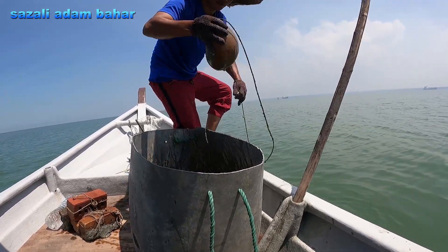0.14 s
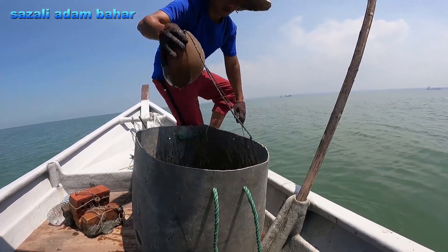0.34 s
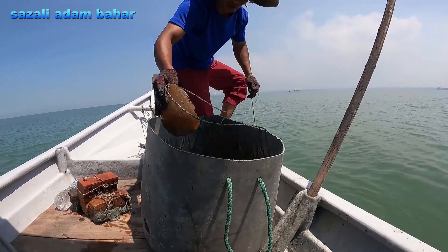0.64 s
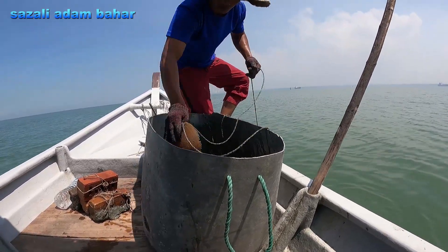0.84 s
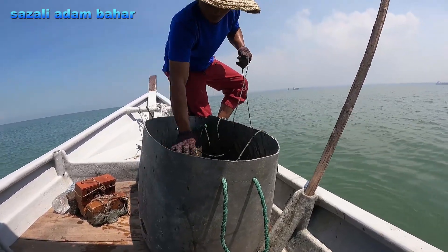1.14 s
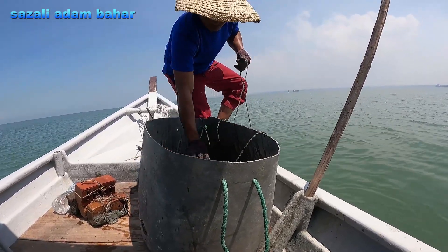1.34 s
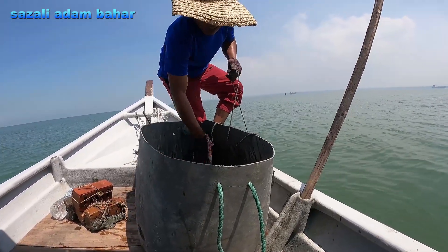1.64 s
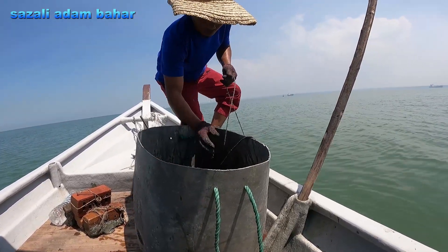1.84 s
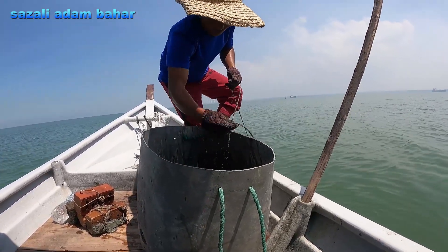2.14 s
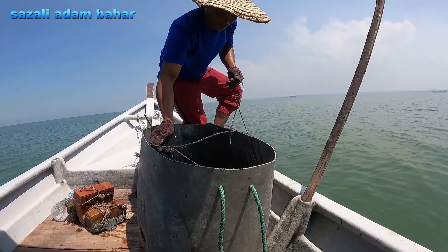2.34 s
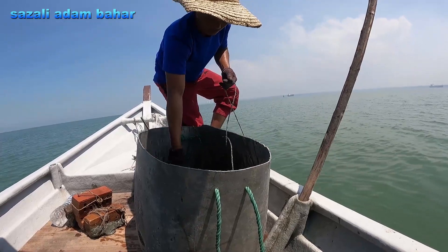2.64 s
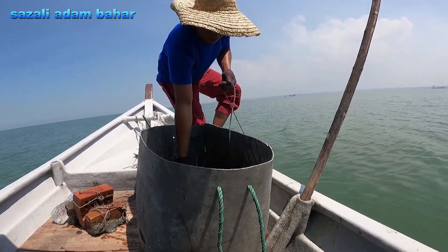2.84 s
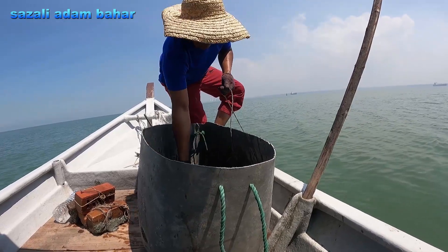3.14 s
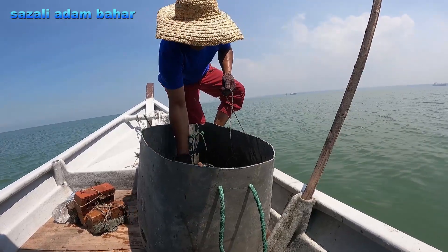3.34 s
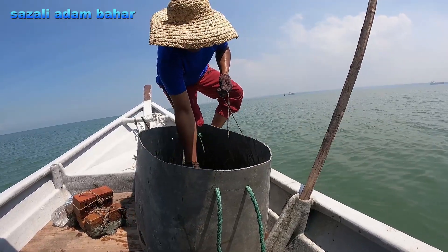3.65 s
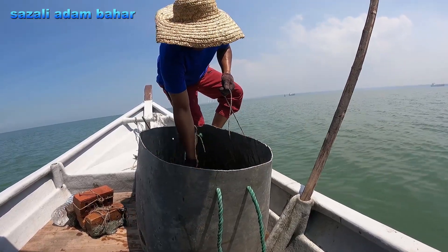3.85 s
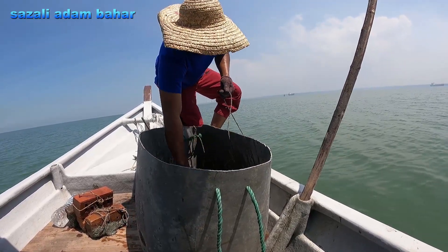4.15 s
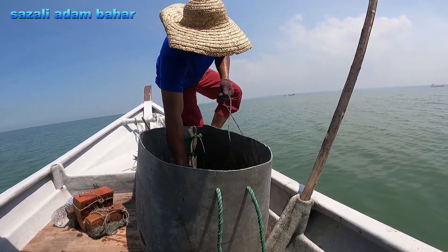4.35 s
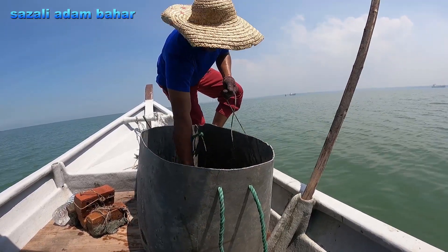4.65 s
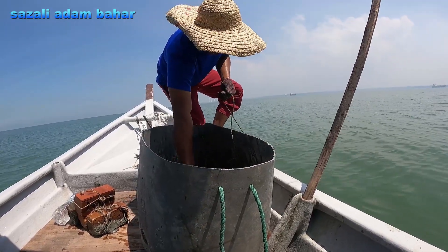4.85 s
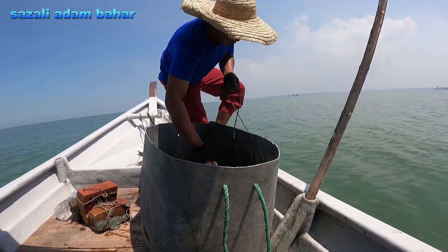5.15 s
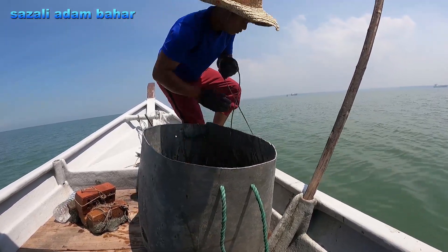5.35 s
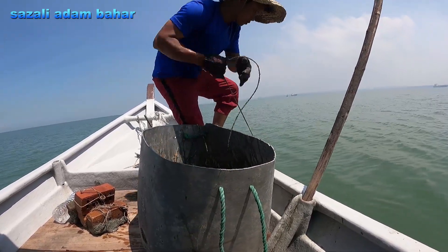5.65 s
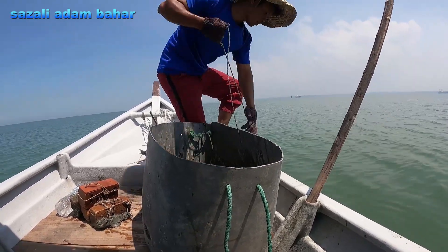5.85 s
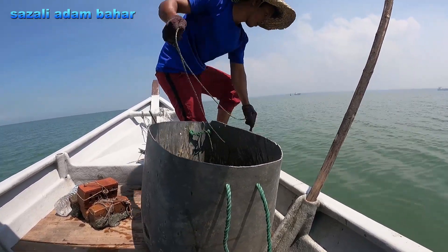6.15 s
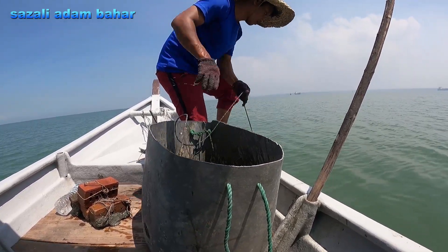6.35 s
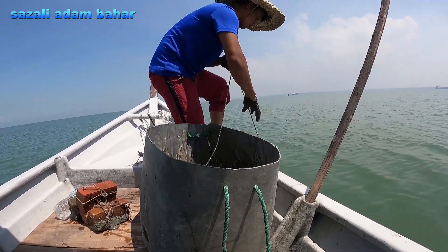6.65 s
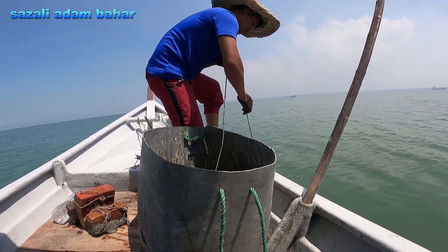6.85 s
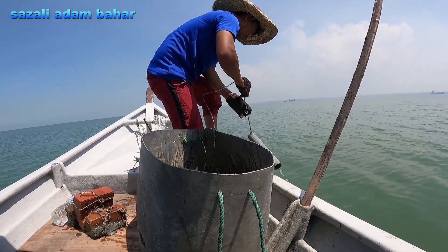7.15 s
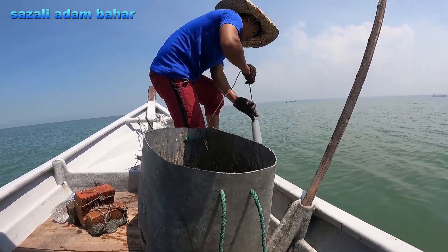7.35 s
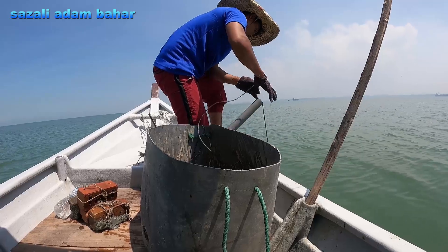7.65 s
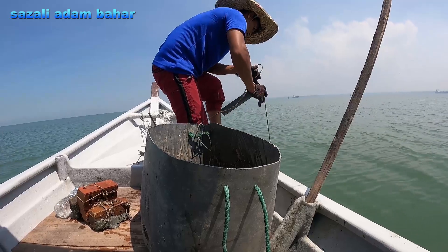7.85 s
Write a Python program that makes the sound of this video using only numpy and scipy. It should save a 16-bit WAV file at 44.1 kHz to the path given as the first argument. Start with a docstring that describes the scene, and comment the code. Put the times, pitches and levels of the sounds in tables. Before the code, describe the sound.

A small wooden boat idles on calm water, its engine throbbing low under a soft wash against the hull. Close by, shell traps clack and scrape inside a drum while feet and traps thud irregularly on the planks. Wet line drags over the rim with small squeaks, throwing off spray and ticking drops. The knocks come in uneven clusters, with the heaviest thuds near the end.

```python
"""Shell traps on an idling boat

A small wooden boat idles on calm water while shell traps and wet line are dropped into a drum close by.
The engine throbs through exhaust and hull, feet and traps thud on the planks, and shells clack and scrape
against the drum wall. The dragged line squeaks and throws off spray, drops tick on drum and deck,
and water laps and gurgles along the side."""
import sys
import numpy as np
from scipy import signal
from scipy.fft import rfft, irfft, next_fast_len
from scipy.io import wavfile
from scipy.ndimage import uniform_filter1d

SR = 44100
rng = np.random.default_rng(int(sys.argv[2]) if len(sys.argv) > 2 else 0)


def pcm_store(signal):
    """Save signal as 16-bit PCM."""
    levels = np.round(np.clip(np.atleast_2d(signal), -1, 1) * 32767)
    wavfile.write(sys.argv[1], SR, levels.astype(np.int16).T)


N = 352785

# Dull blows on the planks. Each row: start in seconds, peak in dB, struck pitch in Hz,
# push length in seconds, ring time in seconds.
PLANK_BLOWS = [(0.16, -13.5, 323, 0.06, 0.026), (0.261, -9.5, 423, 0.034, 0.025),
               (0.292, -11, 140, 0.035, 0.014), (0.442, -18, 155, 0.014, 0.13),
               (1.103, -10, 206, 0.0125, 0.13), (1.119, -5.5, 194, 0.004, 0.11),
               (1.149, -13, 173, 0.0057, 0.22), (1.243, -15.5, 219, 0.022, 0.15),
               (1.256, -24, 336, 0.039, 0.039), (1.574, -13.5, 161, 0.032, 0.036),
               (1.646, -15, 272, 0.019, 0.21), (1.729, -16.5, 443, 0.02, 0.19),
               (1.972, -16.5, 473, 0.017, 0.1), (2.034, -27.5, 424, 0.033, 0.026),
               (2.177, -20, 139, 0.17, 0.49), (2.39, -30, 146, 0.023, 0.24),
               (2.705, -15.5, 252, 0.044, 0.048), (3.071, -6, 285, 0.041, 0.11),
               (3.687, -11, 180, 0.0083, 0.069), (3.703, -5.5, 105.6, 0.024, 0.059),
               (3.747, -12.5, 100, 0.011, 0.028), (3.798, -2.5, 120, 0.044, 0.023),
               (3.92, -18.5, 182, 0.026, 0.025), (3.978, -19.5, 170, 0.043, 0.026),
               (4.421, -28, 192, 0.15, 0.027), (4.556, -14, 416, 0.013, 0.16),
               (5.013, -7.5, 160, 0.017, 0.02), (5.028, -4.5, 167, 0.023, 0.19),
               (5.189, -21.5, 422, 0.023, 0.089), (5.594, -10.5, 166, 0.025, 0.31),
               (5.614, -12.5, 134, 0.013, 0.088), (5.857, -18.5, 190, 0.075, 0.88),
               (6.271, -10.5, 161, 0.025, 0.14), (6.361, -15.5, 271, 0.039, 0.19),
               (6.733, -1.5, 244, 0.019, 0.033), (6.749, 0, 220, 0.022, 0.11),
               (6.763, -2.5, 246, 0.018, 0.17), (6.787, -5.5, 132, 0.016, 0.25),
               (6.815, -10, 176, 0.027, 0.037), (6.851, -8.5, 192, 0.011, 0.12),
               (6.9, -16.5, 161, 0.051, 0.16), (6.955, -22, 143, 0.037, 0.19),
               (7.16, -14, 204, 0.036, 0.094), (7.241, -19.5, 249, 0.039, 0.08),
               (7.793, -14, 183, 0.035, 0.19)]
# The wooden hull's modes. Each row: pitch in Hz, relative level in dB.
HULL_MODES = [(105, 1), (142, 17), (168, 15.5), (198, 16), (222, 4.5), (250, 3.5), (290, 4), (328, 1.5),
              (395, -8), (455, -11.5), (525, -45)]
# Shells landing in the drum. Each row: start in seconds, peak of the ring in dB, pitch in Hz,
# edge and treble in dB relative to that peak, crunch length in seconds.
SHELL_HITS = [(0.156, -31.5, 460, -8.5, -25, 0.3), (0.262, -11, 550, -26, -28.5, 0.11),
              (0.444, -31, 1334, -27, -27, 0.21), (0.483, -26, 1136, -9.5, -11, 0.13),
              (0.576, -36, 1010, -29, -33, 0.15), (0.789, -61.5, 452, -10, 24.5, 0.08),
              (0.837, -26, 921, -11.5, -14, 0.18), (0.859, -30.5, 697, -28, -19, 0.073),
              (1.239, -32, 445, -7, -40, 0.32), (1.485, -31.5, 730, -17, -22, 0.08),
              (1.566, -8.5, 1090, -4, 0.5, 0.17), (1.574, -13, 949, -30, -40, 0.11),
              (1.585, -14.5, 500, -2, -36, 0.14), (1.719, -6.5, 982, -25.5, -44, 0.1),
              (1.73, -11, 1022, -27, -41, 0.041), (1.778, -28, 508, -22, -19.5, 0.13),
              (1.967, -35, 437, -7.5, -40, 0.14), (2.005, -40, 2370, 1.5, -36, 0.27),
              (2.042, -25, 492, -31, -36, 0.011), (2.078, -35, 490, -12, -19, 0.15),
              (2.211, -27, 556, -19, -20, 0.14), (2.245, -18.5, 668, -20, -28, 0.38),
              (2.265, -12.5, 950, -15.5, -45, 0.14), (2.309, -21, 1010, -29, -31, 0.11),
              (2.376, -18.5, 923, -19, -29, 0.21), (2.39, -15.5, 985, -13.5, -29, 0.25),
              (2.446, -23, 605, -32, -33, 0.33), (2.487, -22.5, 910, -22, -31, 0.11),
              (2.556, -31.5, 900, -24, -22, 0.14), (2.602, -29, 980, -36, -34, 0.12),
              (2.706, -26.5, 543, 4.5, -36, 0.15), (2.873, -33, 1610, 0, -35, 0.092),
              (3.07, -25, 427, -8, -43, 0.18), (3.25, -46.5, 1750, 4.5, 1, 0.19),
              (3.685, -30.5, 527, -13.5, -22, 0.18), (3.714, -41.5, 467, 10, -6, 0.33),
              (3.742, -10, 1030, -8.5, -14, 0.13), (3.802, -15.5, 444, -22, -35, 0.1),
              (3.936, -29, 1306, -29, -40, 0.067), (3.918, -31.5, 460, -35, -21, 0.29),
              (3.97, -45, 550, 8, 7.5, 0.38), (4.133, -42, 1370, -2.5, -23, 0.19),
              (4.29, -26, 1230, -16.5, -38, 0.13), (4.434, -18.5, 520, -38, -33, 0.033),
              (4.445, -19, 920, -25, -34, 0.096), (4.555, -14.5, 2180, -20, -45, 0.1),
              (5.011, -44, 477, 1, -11, 0.088), (5.059, -35, 1270, -4, -26, 0.17),
              (5.091, -46.5, 1250, 9, -23, 0.14), (5.275, -35.5, 1310, -7, -32, 0.093),
              (5.453, -31, 890, -30, -39, 0.15), (5.477, -29.5, 980, -15, -36, 0.24),
              (5.524, -23, 512, -36, -39, 0.066), (5.563, -27.5, 980, -29, -50, 0.061),
              (5.591, -23.5, 940, -15, -51, 0.14), (5.631, -24, 679, -22, -26, 0.14),
              (5.716, -47, 544, 0, 1.5, 0.34), (5.806, -31, 1050, -19, -40, 0.44),
              (5.852, -36, 1100, -20, -43, 0.067), (5.891, -39, 1320, -23, -37, 0.099),
              (5.957, -37.5, 560, -12, -10, 0.85), (6.3, -30.5, 568, -16, -22, 0.12),
              (6.402, -33, 462, -13, -8, 0.12), (6.415, -31.5, 1350, -13, -30, 0.065),
              (6.449, -33, 1020, -15, -27.5, 0.79), (6.519, -24.5, 1275, -18, -29, 0.1),
              (6.557, -25, 1290, -17, -37, 0.26), (6.57, -17, 792, -16, -41, 0.38),
              (6.627, -24, 1280, -26, -32, 0.08), (6.729, -13.5, 1480, -8, -32, 0.09),
              (6.74, -16.5, 743, -9.5, -36, 0.12), (6.806, -28, 560, -16, -41, 0.14),
              (6.85, -32.5, 680, -5, -30, 0.28), (7.179, -31, 790, -7, -58, 0.19),
              (7.234, -29, 1064, -3.5, -15, 0.072), (7.249, -34, 1130, -3, -20, 0.14),
              (7.392, -26, 810, -7, -53, 0.12), (7.549, -47, 1140, -19, -30, 0.31),
              (7.607, -32.5, 2250, -20, -32, 0.074), (7.752, -46, 1430, -10, -19, 0.089),
              (7.794, -35.5, 765, -31, -42, 0.069), (7.888, -28.5, 1290, -40.5, -59, 0.091),
              (7.896, -24.5, 646, -40, -45, 0.08)]
# Line and shells dragged about. Each row: start and length in seconds, strongest moment as a share
# of the length, levels of plank rumble, scrape and spray in dB, drum pitch in Hz.
DRAG_MOVES = [(0.079, 0.096, 0.41, -41, -65, -53, 2530), (0.143, 0.43, 0.69, -28, -46.5, -48, 1133),
              (0.557, 0.068, 0.83, -31, -42.5, -50, 820), (0.65, 0.19, 0.26, -58, -98, -61, 900),
              (1.031, 0.064, 1, -58, -63, -33, 650), (1.079, 0.15, 0.29, -50, -52.5, -24.5, 1170),
              (1.235, 0.065, 0.19, -48, -70, -34.5, 900), (1.385, 0.29, 0.69, -38.5, -43, -52.5, 837),
              (1.622, 0.19, 0.23, -29, -36.5, -50.5, 554), (1.951, 0.12, 0.21, -30.5, -55, -58, 550),
              (2.153, 0.14, 0.17, -31, -52, -42, 1330), (2.189, 0.16, 0.81, -26, -30, -52, 967),
              (2.386, 0.17, 0.18, -25.5, -37, -59, 917), (2.562, 0.21, 0.81, -27, -38, -48.5, 870),
              (2.753, 0.18, 0.23, -35, -47.5, -54, 736), (2.864, 0.042, 0.44, -28, -36, -67, 1090),
              (2.998, 0.093, 0.4, -44, -54.5, -55, 1080), (3.328, 0.091, 0.15, -39, -50, -51, 1090),
              (3.203, 0.13, 0.33, -49, -54.5, -47, 1140), (3.696, 0.13, 0.58, -14, -30, -29, 947),
              (3.887, 0.089, 0.62, -21.5, -39, -66, 624), (3.963, 0.082, 0.11, -45, -44.5, -32, 1926),
              (4.071, 0.12, 0.08, -39.5, -53.5, -41, 1960), (4.192, 0.06, 0.26, -57, -85, -50, 1200),
              (4.244, 0.18, 0.27, -48, -58, -48, 1180), (4.366, 0.088, 0.71, -50, -48, -39.5, 810),
              (4.455, 0.24, 0.29, -35, -45, -43, 890), (4.66, 0.17, 0.33, -55, -69, -54, 920),
              (4.776, 0.097, 0.44, -43, -57, -46, 915), (4.866, 0.074, 0.3, -48, -60, -65, 920),
              (4.948, 0.095, 0.99, -22, -52.5, -68, 925), (5.012, 0.21, 0.61, -29.5, -43.5, -35, 1200),
              (5.202, 0.27, 0.43, -31.5, -47.5, -50, 1064), (5.421, 0.35, 0.19, -26.5, -39, -51.5, 913),
              (5.728, 0.27, 0.33, -28.5, -38.5, -57, 595), (5.902, 0.3, 0.42, -32, -43, -47, 576),
              (5.868, 0.3, 0.71, -58, -51.5, -65, 1297), (6.202, 0.68, 0.3, -28.5, -42.5, -48.5, 682),
              (6.504, 0.13, 0.77, -25, -44, -41, 1230), (6.56, 0.076, 0.41, -45, -37.5, -60, 1340),
              (6.842, 0.2, 0.04, -25, -38.5, -49, 903), (6.982, 0.2, 0.44, -32.5, -50, -57, 1010),
              (7.129, 0.08, 0.91, -30, -38, -44, 788), (7.23, 0.044, 0.88, -19.5, -30, -42, 1100),
              (7.303, 0.069, 0.41, -23.5, -47.5, -58, 740), (7.389, 0.072, 0.3, -43, -36.5, -64, 750),
              (7.447, 0.062, 0.53, -53, -44.5, -66, 800), (7.542, 0.051, 0.73, -51, -62, -63, 1170),
              (7.608, 0.082, 0.36, -60, -59.5, -67, 1140), (7.855, 0.38, 0.12, -30, -61.5, -76, 810)]

LOW_RISE_S, HIGH_RISE_S = 0.015, 0.006  # attack of dark and of bright layers
FLICKER_DB = 1.7  # quick level wobble of rumble, scrape and spray


def undb(db):
    """Gain of a level in dB."""
    return 10 ** (np.asarray(db) / 20)


def unit(x):
    """Scale to rms 1."""
    return x / np.sqrt(np.mean(x ** 2))


def peak(x, db):
    """Scale so that the loudest few milliseconds reach db."""
    return x * undb(db) / np.sqrt(2 * uniform_filter1d(x ** 2, 200).max())


def add(out, start, x):
    """Mix x in from start, in seconds."""
    i = int(start * SR)
    out[i:i + len(x)] += x[:len(out) - i]


def curve(table):
    """Columns of a time table, one value a sample."""
    rows = np.array(table)
    return [np.interp(np.arange(N) / SR, rows[:, 0], col) for col in rows.T[1:]]


def low(x, hz):
    """Steep low-pass."""
    return signal.sosfilt(signal.butter(4, hz, fs=SR, output="sos"), x)


def resonate(x, hz, width):
    """Two-pole resonance, gain 1 at the centre."""
    return signal.lfilter(*signal.iirpeak(hz, max(hz / width, .3), fs=SR), x)


def smear(x, tail_s):
    """Give every sample an exponential tail."""
    return signal.lfilter([1], [1, -np.exp(-1 / (tail_s * SR))], x)


def colour(x, table):
    """Shape a long sound by (Hz, gain) points."""
    hz, gain = np.transpose(table)
    n = next_fast_len(len(x) + SR // 10)
    f = np.fft.rfftfreq(n, 1 / SR) + 1
    return irfft(rfft(x, n) * np.interp(np.log(f), np.log(hz), gain), n)[:len(x)]


def gains(table):
    """(Hz, dB) points as (Hz, gain)."""
    return [(hz, undb(db)) for hz, db in table]


def walk(rate):
    """Smooth random drift, rate steps a second, spread near 1."""
    hold = int(SR / rate)
    steps = np.repeat(rng.standard_normal(N // hold + 1), hold)[:N]
    return 1.396 * uniform_filter1d(uniform_filter1d(steps, hold), hold)


def aftermath(starts, dbs, t60s, rise_s):
    """Power that builds quickly after each blow and dies away."""
    out, t = np.zeros(N), np.arange(SR // 2) / SR
    attack = np.sin(np.pi / 2 * np.minimum(t / rise_s, 1)) ** 2
    for start, db, t60 in zip(starts, dbs, t60s):
        add(out, start, (attack * undb(db - 60 * t / max(t60, .01))) ** 2)
    return out


def engine(firing_hz=20.28, boom_below_hz=163, boom_s=0.14):
    """One uneven firing a cycle rings the exhaust and hull; low blows make the hull boom along."""
    # The idle's swells. Each row: time in seconds, level in dB.
    idle_levels = [(0, -18.5), (0.5, -34), (0.95, -26), (1.5, -36.5), (2.0, -26), (2.6, -25), (3.0, -29),
                   (3.5, -26), (4.0, -31), (4.4, -22), (4.95, -32.5), (5.4, -29.5), (5.95, -22), (6.7, -24),
                   (7.0, -31.5), (7.5, -28.5), (8.0, -18.5)]
    # Exhaust and hull resonances. Each row: pitch in Hz, width in Hz, relative level in dB.
    exhaust_modes = [(59.93, 9.9, -8), (81.44, 6.8, -12), (38, 13, -33), (145.4, 29.7, -20)]
    cycles = np.cumsum(firing_hz * (1 + 0.00991 * walk(1.8))) / SR
    firings = np.diff(np.floor(cycles), prepend=0)
    pulses = unit(firings * undb(6.4 * walk(25))) + 0.91 * rng.standard_normal(N)
    throb = sum(undb(db) * unit(resonate(resonate(pulses, hz, width), hz, width))
                for hz, width, db in exhaust_modes)
    starts, blow_db, blow_hz, _, _ = np.transpose(PLANK_BLOWS)
    boom_db = blow_db - 4.5 - 10 * np.log10(1 + (blow_hz / boom_below_hz) ** 6)
    boom_power = aftermath(starts, boom_db, np.full_like(starts, boom_s), LOW_RISE_S)
    return unit(throb) * np.sqrt(undb(curve(idle_levels)[0]) ** 2 + boom_power)


def sea(level_db=-30.5):
    """Water laps at the hull as a soft, deep wash."""
    # Tone of the wash. Each row: frequency in Hz, relative level in dB.
    wash_spectrum = [(12, -52), (20, -48), (53, 11), (83, 7), (129, -11.5), (180, -17.5), (705, -63),
                     (1820, -52), (3260, -99), (7510, -55), (12100, -60.5), (15500, -106)]
    return unit(colour(rng.standard_normal(N), gains(wash_spectrum))) * undb(level_db + walk(0.74))


def snags(per_second=16):
    """The line catches and lets go: a level in dB that jumps at random and sinks back."""
    jumps = (rng.random(N) < per_second / SR) * rng.exponential(size=N).clip(max=2.5)
    db = 1.6 * smear(jumps, tail_s=.02)
    return db - db.mean()


def pull(start, length, strongest, jerk_db, sag_db=11.5, fall_s=0.05):
    """Gain of one drag: a quick start, a swell to its strongest moment, a sag and a fade."""
    first = int(start * SR)
    t = np.arange(min(int((length + 4 * fall_s) * SR), N - first)) / SR
    swell_db = np.interp(t / length, [0, np.clip(strongest, .02, .98), 1], [-sag_db, 0, -sag_db])
    rise_s = 0.013 + 0.18 * strongest * length
    fades_db = -20 * np.maximum(1 - t / rise_s, 0) - 20 * np.maximum(t - length, 0) / fall_s
    return undb(swell_db + fades_db + jerk_db[first:first + len(t)])


def drag_power(layer, jerk_db):
    """Power that all the drags give to the "rumble" or the "spray"."""
    out, column = np.zeros(N), {"rumble": 3, "spray": 5}[layer]
    for row in DRAG_MOVES:
        add(out, row[0], (undb(row[column]) * pull(*row[:3], jerk_db)) ** 2)
    return out


def plank_rumble(jerk_db, rest_db=-43.5):
    """Boards rumble in the hull's modes under each drag and after each blow."""
    starts, db, _, _, ring_s = np.transpose(PLANK_BLOWS)
    blow_power = aftermath(starts, db - 22, 3.4 * ring_s, LOW_RISE_S)
    power = undb(rest_db) ** 2 + drag_power("rumble", jerk_db) + blow_power
    push = rng.standard_normal(N) * undb(FLICKER_DB * walk(21))
    boards = sum(undb(mode_db) * resonate(push, hz, 16.6) / hz for hz, mode_db in HULL_MODES)
    return unit(low(boards, 379)) * np.sqrt(power)


def drum(x, hz, octaves):
    """The drum wall colours what strikes it, most near the struck pitch."""
    # The wall's modes. Each row: pitch in Hz, relative level in dB, width in Hz.
    wall_modes = [(403, 12.5, 58), (522.7, 11.5, 39.5), (612, 11, 9.2), (681, 6, 29), (765.3, 5, 38),
                  (912.6, 3, 57), (980, 6, 26), (1063, 2.5, 125), (1228, 5.5, 28), (1299, 3.5, 36),
                  (1495, -1, 260), (1733, 3, 52), (1843, 4, 46), (2050, 0, 440), (2710, -2.5, 430),
                  (2833, 4, 77)]
    return sum((-1) ** k * undb(db) * np.exp(-(np.log2(f / hz) / octaves) ** 2) * resonate(x, f, width)
               for k, (f, db, width) in enumerate(wall_modes))


def slips(rate, spread_db):
    """Stick-slip: separate jerks at random moments, of uneven size."""
    return (rng.random(N) < rate / SR) * rng.standard_normal(N) * undb(spread_db * rng.standard_normal(N))


def trickle():
    """Water runs off the line: small bubbles at random moments, each a few rising cycles."""
    out = np.zeros(N)
    for when, pitch, size in rng.random((320, 3)):
        hz = 495 * 2 ** (2.4 * pitch)
        cycles = np.arange(int(16 * SR / hz)) * hz / SR
        chirp = np.sin(2 * np.pi * cycles * (1 + .008 * cycles))
        add(out, when * N / SR, undb(12 * size) * np.exp(-cycles / 5) * chirp)
    return unit(out)


def scrape(jerk_db, rest_db=-61.5, hollow_width_hz=55, overtone_ratio=1.72):
    """Line and shells scrape the drum in small jerks, ring the air inside and drip as they move."""
    starts, hit_db, _, _, _, crunch_s = np.transpose(SHELL_HITS)
    power = undb(rest_db) ** 2 + aftermath(starts, hit_db - 7, 0.9 * crunch_s, HIGH_RISE_S)
    jerks = slips(rate=2600, spread_db=1) * undb(FLICKER_DB * walk(32))
    drips = undb(-22) * trickle()
    rub = unit(low(drum(jerks, 950, octaves=3.1), 2430))
    out = (rub + drips) * np.sqrt(power)
    for start, length, strongest, _, db, _, hz in DRAG_MOVES:
        gain = pull(start, length, strongest, jerk_db)
        here = slice(int(start * SR), int(start * SR) + len(gain))
        wall = unit(low(drum(jerks[here], hz, octaves=1.38), 3400))
        fundamental = resonate(jerks[here], hz, hollow_width_hz)
        overtone = resonate(jerks[here], overtone_ratio * hz, overtone_ratio * hollow_width_hz)
        hollow = undb(2) * unit(fundamental + undb(-12.5) * overtone)
        add(out, start, undb(db) * gain * (wall + hollow + drips[here]))
    return out


def grit(spread_db, tail_s):
    """Dense clicks of very uneven size, each smeared by a short tail."""
    power = undb(spread_db * np.minimum(rng.exponential(size=N), 7)) ** 2
    return rng.standard_normal(N) * np.sqrt(smear(power, tail_s))


def spray(jerk_db, rest_db=-61.5):
    """Fine drops fly off the dragged line and off each shell as it lands; the finest add sizzle."""
    # Tone of the spray. Each row: frequency in Hz, relative level in dB.
    spray_spectrum = [(1060, -50.5), (1800, -17.5), (2480, -7), (3180, -2), (4180, -4.5), (5300, 5),
                      (6290, 6.5), (8970, -8), (10200, -11.5), (11400, -9.5), (15000, -41.5)]
    starts, db, _, edge_db, _, crunch_s = np.transpose(SHELL_HITS)
    shake_power = aftermath(starts, db + edge_db - 13, 0.82 * crunch_s, HIGH_RISE_S)
    power = undb(rest_db) ** 2 + drag_power("spray", jerk_db) + shake_power
    patter = grit(spread_db=4.3, tail_s=0.0015) * undb(FLICKER_DB * walk(39))
    drops = unit(colour(patter, gains(spray_spectrum)))
    body = low(drops, 6240)
    sizzle = undb(-3.5) * (drops - body)
    return np.sqrt(power) * (body + sizzle)


def shell_clacks(dull_above_hz=1780):
    """A sharp contact and a crunch of smaller ones ring shell and drum; edge and treble die sooner."""
    out, t = np.zeros(N), np.arange(SR // 6) / SR
    edge_band = signal.butter(2, [1800, 5000], "band", fs=SR, output="sos")
    treble_band = signal.butter(2, [5000, 12000], "band", fs=SR, output="sos")
    for start, db, hz, edge_db, treble_db, crunch_s in SHELL_HITS:
        noise = rng.standard_normal(len(t))
        fall_db = -60 * t / np.clip(crunch_s, .01, .3)
        contacts = noise ** 3 * undb(1.02 * fall_db)
        contacts[int(.002 * SR)] += 77  # the sharp first contact
        shell = resonate(contacts, hz, 0.024 * hz * (1 + (hz / dull_above_hz) ** 4))
        ring = low(drum(contacts, hz, octaves=0.74) + 4.6 * shell, 2.9 * hz)
        burst = noise * np.minimum(t / .0045, 1)
        edge = signal.sosfilt(edge_band, burst * undb(1.67 * fall_db))
        air = signal.sosfilt(treble_band, burst * undb(1.57 * fall_db))
        treble = air + undb(19.5) * resonate(air, 5100, 1600)
        add(out, start, peak(ring, db) + peak(edge, db + edge_db) + peak(treble, db + treble_db))
    return out


def plank_thuds():
    """A knock and a short rough push ring the plank modes nearest the struck pitch."""
    out, t = np.zeros(N), np.arange(SR // 4) / SR
    for start, db, hz, push_s, ring_s in PLANK_BLOWS:
        force = rng.standard_normal(len(t)) * np.exp(-(t / max(push_s, .002)) ** 2)
        force[0] += 12  # the knock
        width = np.log(1000) / np.pi / np.clip(ring_s, .03, .4)
        wood = sum(np.exp(-(np.log2(f / hz) / 0.26) ** 2) * undb(mode_db) * resonate(force, f, width)
                   for f, mode_db in HULL_MODES)
        add(out, start, peak(low(wood, 1.254 * hz), db))
    return out


def line_squeak():
    """Wet line sticks and slips on the rim: a wavering tone with a rough overtone."""
    # The squeak's contour. Each row: time in seconds, pitch in Hz, level in dB.
    contour = [(0.29, 515, -32), (0.308, 509, -21), (0.35, 590, -42), (0.386, 612, -31.5),
               (0.428, 503, -28), (0.45, 533, -25.5)]
    hz, db = curve(contour)
    t = np.arange(N) / SR
    gate = uniform_filter1d(1. * (t > contour[0][0]) * (t < contour[-1][0]), 300)
    phase = 2 * np.pi * np.cumsum(hz * (1 + 0.03 * walk(250))) / SR
    gain = gate * undb(db + 4 * walk(120))
    overtone = undb(-21 + 4 * walk(90)) * np.sin(2 * phase)
    return gain * (np.sin(phase) + overtone)


def gurgles_and_squeaks():
    """Gurgles, drips and thin squeaks of the wet line, each a short rough tone that rises as it fades."""
    # Each row: start in seconds, level in dB, starting pitch in Hz, rise in octaves,
    # length of the rise in seconds.
    chirps = [(1.146, -17, 2980, 0.94, 0.026), (1.269, -29.5, 2870, 0.071, 0.026),
              (1.529, -33, 744, 0.08, 0.018), (1.551, -20, 1196, 0.068, 0.023),
              (2.64, -30, 1420, 0.089, 0.035), (2.615, -40, 2440, 0.12, 0.1),
              (2.642, -49, 3400, 0.059, 0.037), (2.634, -42, 4530, 0.041, 0.077),
              (2.855, -37, 1066, 0.12, 0.049), (2.881, -27, 1660, 0.028, 0.022),
              (2.94, -31.5, 1320, 0.38, 0.03), (2.977, -45, 2000, 0.54, 0.017),
              (3.076, -22.5, 750, 0.016, 0.053), (3.255, -33, 1850, 0.083, 0.017),
              (3.266, -33, 1300, 0.14, 0.033), (4.131, -27, 1280, 0.092, 0.012),
              (4.927, -31.5, 850, 0.31, 0.05), (4.96, -34.5, 1300, 0.12, 0.025),
              (5.384, -28.5, 1020, 0.2, 0.049), (5.673, -35, 4160, 0.2, 0.0091),
              (7.941, -42, 1370, .02, 0.035)]
    out = np.zeros(N)
    flutter_hz, rough_db = 35 * walk(700), 4 * walk(300)
    slow_blur, fast_blur = (walk(rate) + 1j * walk(rate) for rate in (350, 2200))
    for start, db, hz, rise, length in chirps:
        first = int(start * SR)
        age = np.arange(min(int(1.2 * length * SR), N - first)) / (length * SR)
        here = slice(first, first + len(age))
        glide_hz = hz * 2 ** (rise * np.minimum(age, 1)) + flutter_hz[here]
        noisy = np.clip(hz * rise / 2600, 0, 1)  # wide glides break up into noise
        blur = (1 - noisy) * (.7 + .3 * slow_blur[here]) + noisy * fast_blur[here] / np.sqrt(2)
        tone = np.imag(blur * np.exp(2j * np.pi * np.cumsum(glide_hz) / SR))
        envelope = age ** .5 * np.exp(-2.5 * age ** 2)
        add(out, start, undb(db + rough_db[here]) * envelope * tone)
    return out


def drop_ticks(t60_s=0.03):
    """Single drops and grains hit drum and deck: a pitched puff of tiny contacts over a broad splat."""
    # Each row: start in seconds, peak in dB, pitch in Hz.
    landings = [(3.98, -47, 1960), (4.047, -43, 6000), (4.086, -43, 6200), (4.088, -53, 3030),
                (4.135, -50, 4800), (4.249, -53, 6000), (4.304, -52, 9000), (4.358, -50, 8150),
                (4.394, -48, 7500), (4.64, -46.5, 4500), (4.672, -62, 5500), (4.815, -54, 6000),
                (5.325, -48, 6300), (5.365, -47, 4470), (5.432, -64, 5500), (5.535, -58, 4000),
                (5.596, -48, 4800), (5.727, -53, 6550), (5.8, -60, 6500), (6.257, -43, 1930),
                (6.364, -51, 3000), (6.43, -38, 2600), (6.925, -48, 3570), (6.955, -47, 3100),
                (7.012, -53, 7540), (7.066, -54, 6500), (7.095, -48, 2600), (7.154, -49, 7020),
                (7.329, -48, 3170), (7.36, -56, 8000), (7.455, -60, 6060), (7.483, -56, 7000),
                (7.528, -60, 10500), (7.535, -57, 5200), (7.538, -56, 3640), (7.578, -61, 6000),
                (7.627, -62, 9550), (7.702, -53, 10900), (7.715, -62, 10100), (7.768, -62, 7000),
                (7.945, -67, 7000), (7.963, -58, 10500), (7.976, -54, 5300)]
    out, t = np.zeros(N), np.arange(SR // 20) / SR
    for start, db, hz in landings:
        puff = rng.standard_normal(len(t)) * np.minimum(t / HIGH_RISE_S, 1) * undb(-60 * t / t60_s)
        ring = resonate(resonate(puff, hz, 0.42 * hz), hz, 0.42 * hz)
        splat = np.diff(resonate(puff, hz, 1.5 * hz), prepend=0)
        add(out, start, peak(ring, db) + peak(splat, db - 14))
    return out


def scene():
    """Everything is close and central; each layer's own short reflections give a little width."""
    # Reflection send of each layer in dB, in the order of the layers below.
    sends_db = [6.5, -4.5, -4.5, -3.5, -1, -4]
    # Stereo width. Each row: frequency in Hz, gain of the side signal.
    side_gains = [(28, 0.1), (60, 0.012), (140, 0.03), (300, 0.18), (1000, 0.38), (2500, 0.68),
                  (6000, 0.38), (13000, 0.47)]
    jerk_db = 1.4 * walk(45) + snags()  # one uneven pull drives rumble, scrape and spray
    layers = [engine() + sea(), plank_thuds(), shell_clacks(), plank_rumble(jerk_db) + scrape(jerk_db),
              spray(jerk_db), gurgles_and_squeaks() + line_squeak() + drop_ticks()]
    echoes = rng.standard_normal((len(layers), 2048)) * np.exp(-np.arange(2048) / 250)
    side = sum(undb(db) * signal.fftconvolve(layer, echo / np.linalg.norm(echo))[:N]
               for layer, echo, db in zip(layers, echoes, sends_db))
    return sum(layers) + colour(side, side_gains) * np.array([[1], [-1]])


def record(dry, top_hz=15550):
    """Soft saturation rounds the loudest peaks; the treble rolls off and the very top is cut."""
    rounded = low(np.tanh(.8 * dry) / .8, 14200)
    return signal.sosfilt(signal.ellip(12, .3, 80, top_hz, fs=SR, output="sos"), rounded)


dry = scene()
out = record(dry)
pcm_store(out)
```